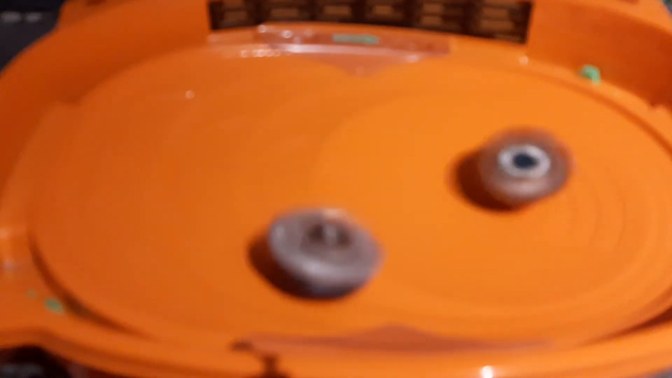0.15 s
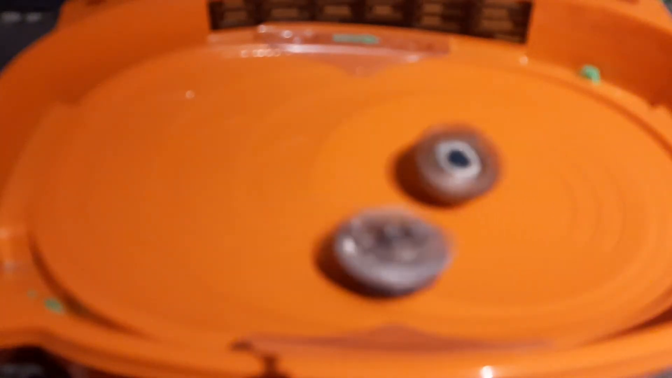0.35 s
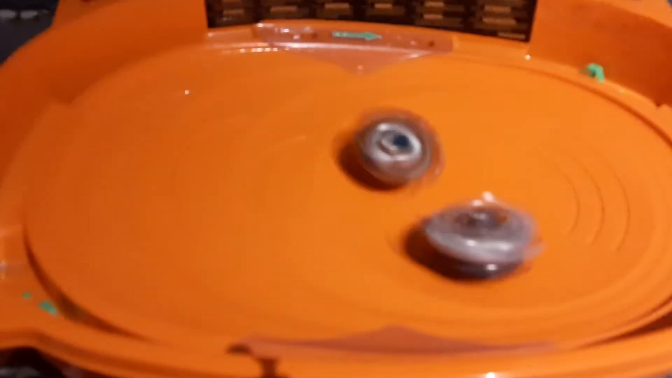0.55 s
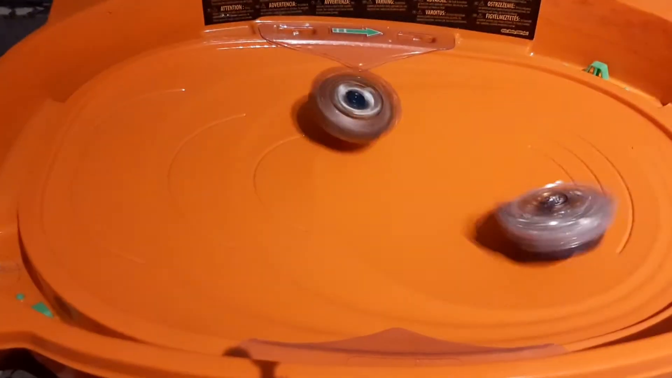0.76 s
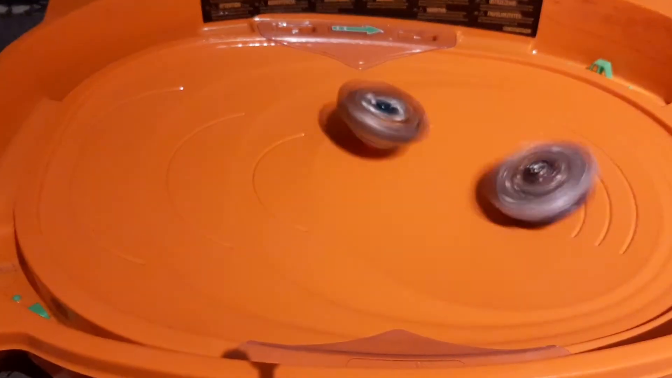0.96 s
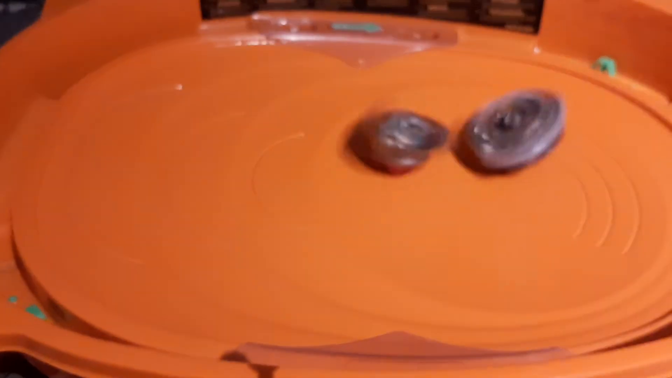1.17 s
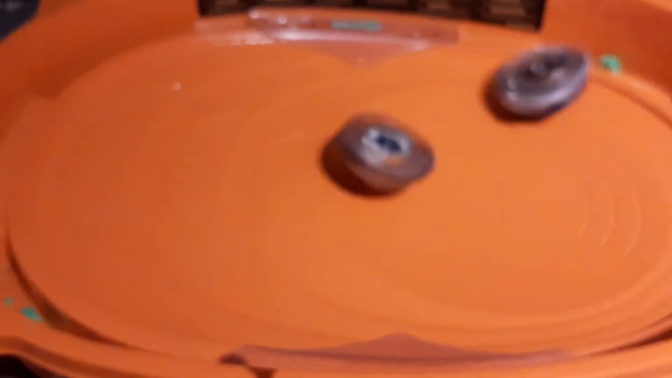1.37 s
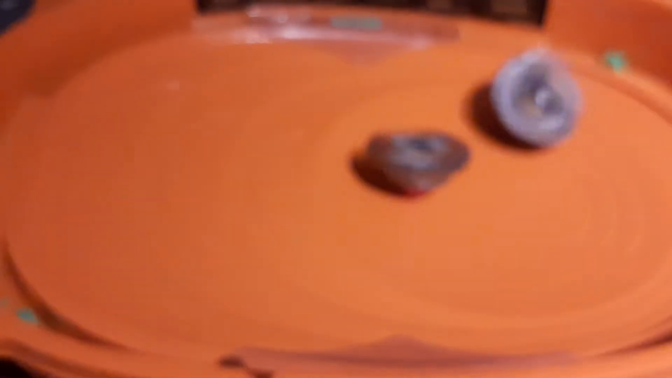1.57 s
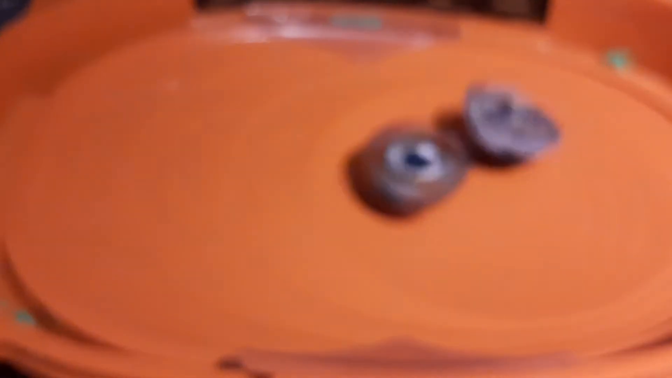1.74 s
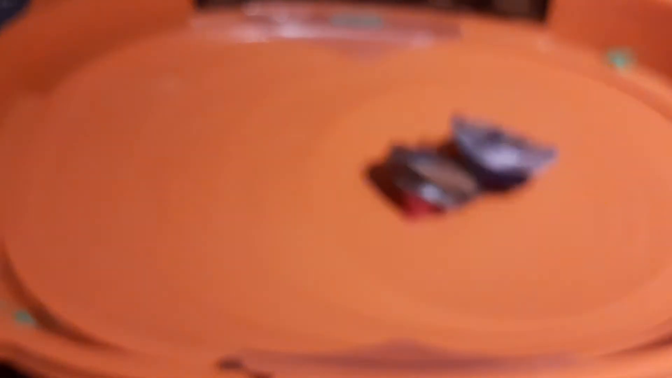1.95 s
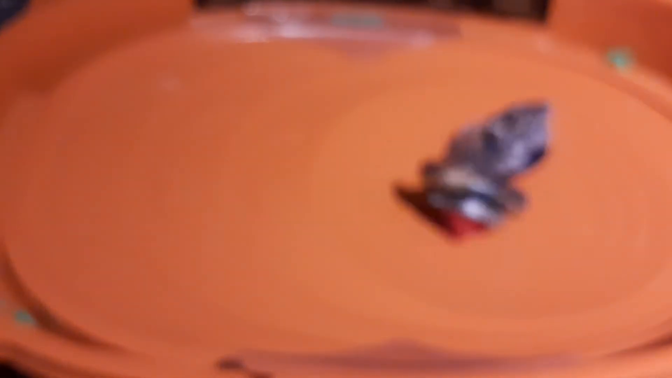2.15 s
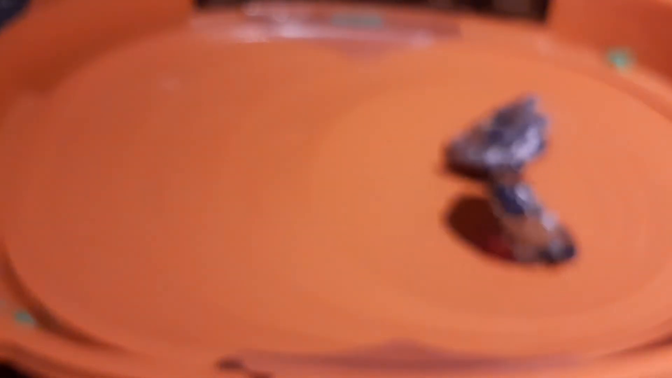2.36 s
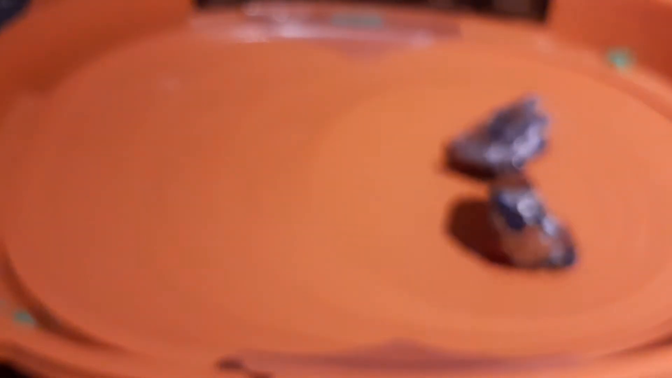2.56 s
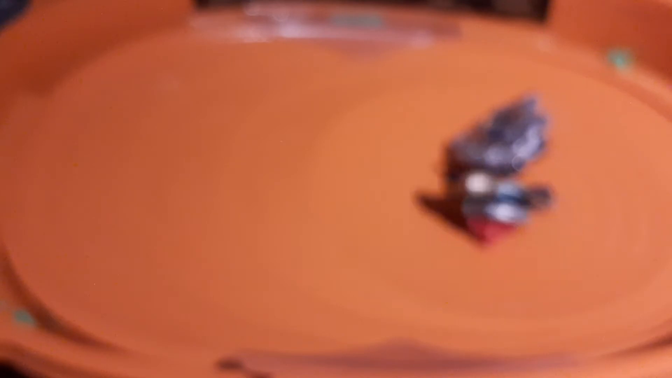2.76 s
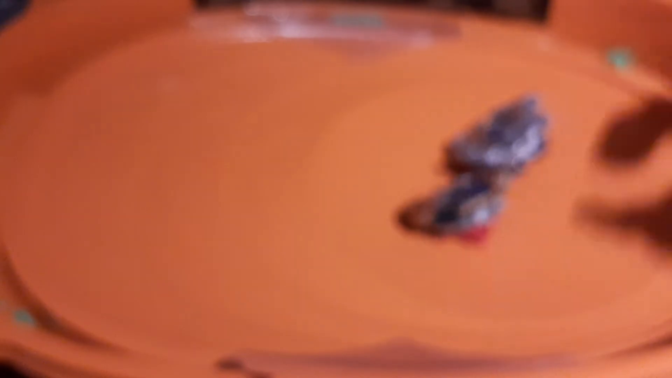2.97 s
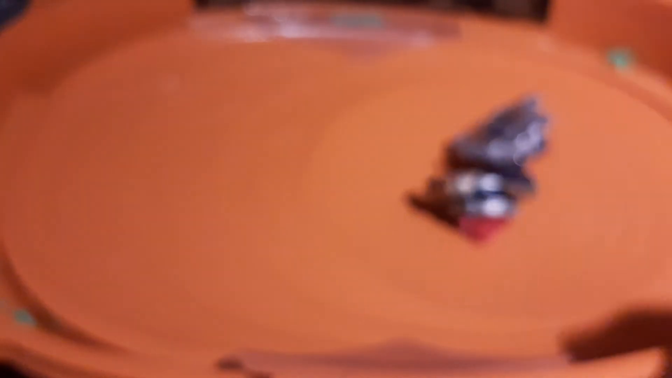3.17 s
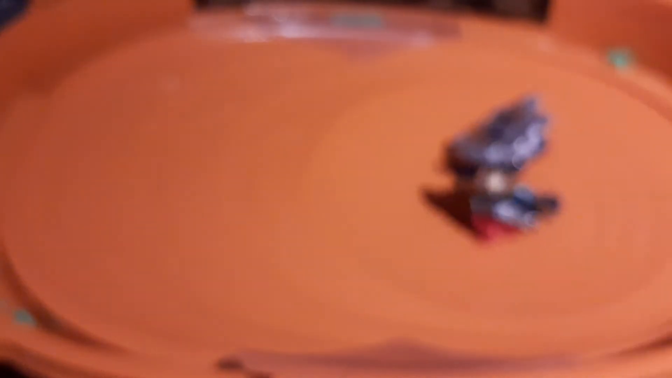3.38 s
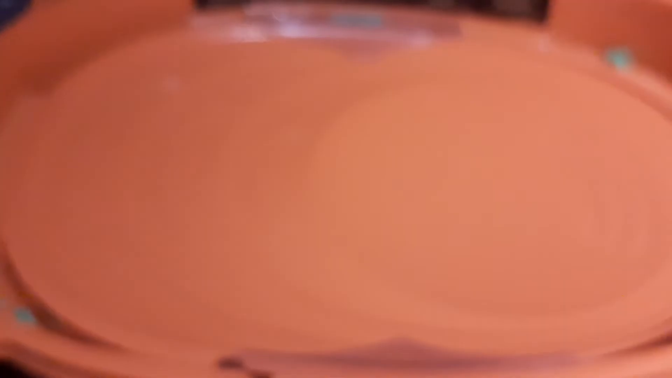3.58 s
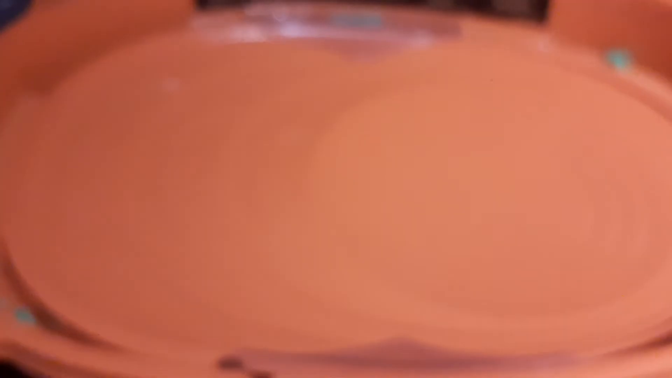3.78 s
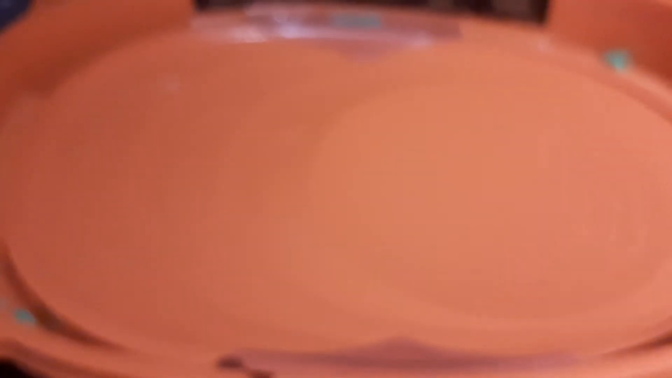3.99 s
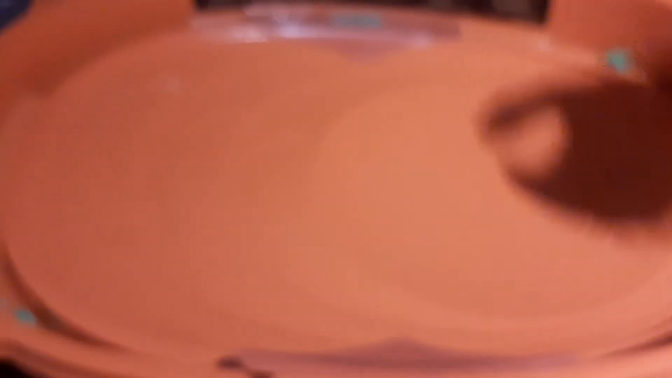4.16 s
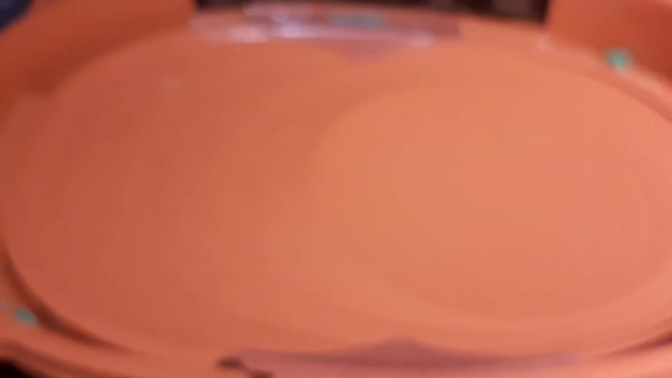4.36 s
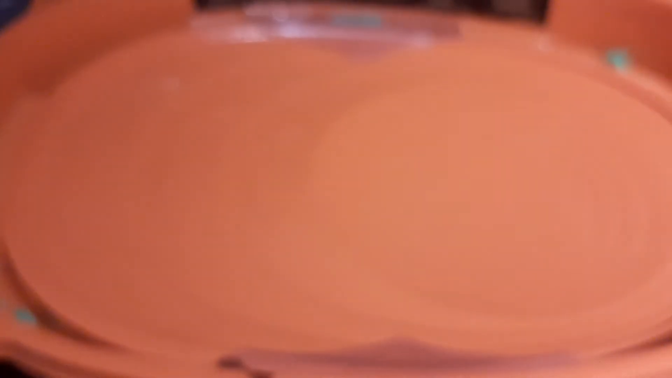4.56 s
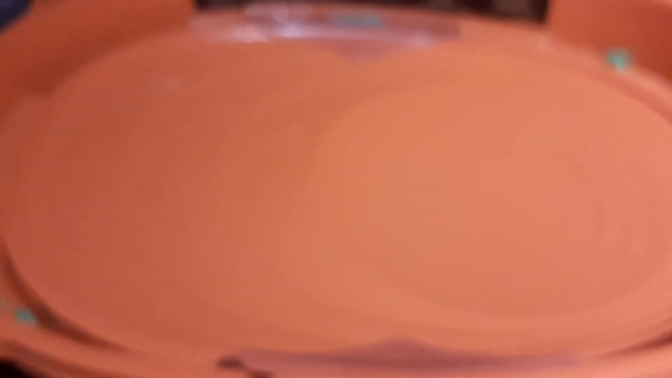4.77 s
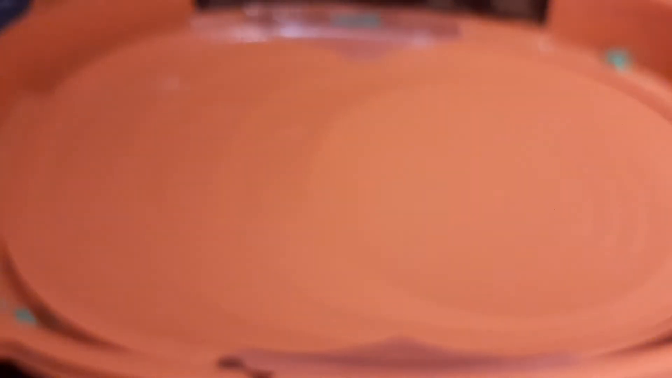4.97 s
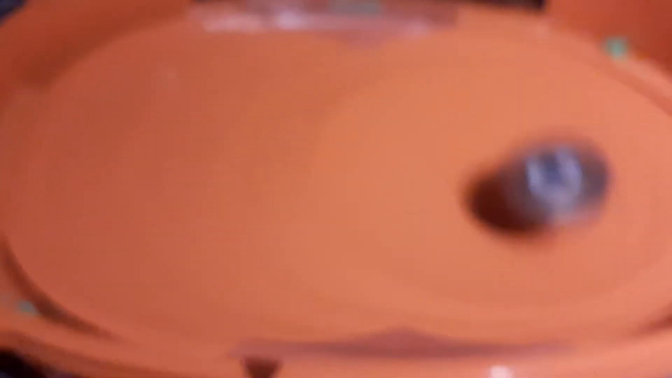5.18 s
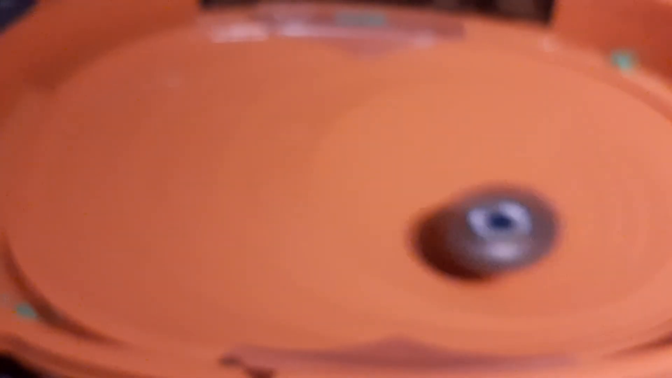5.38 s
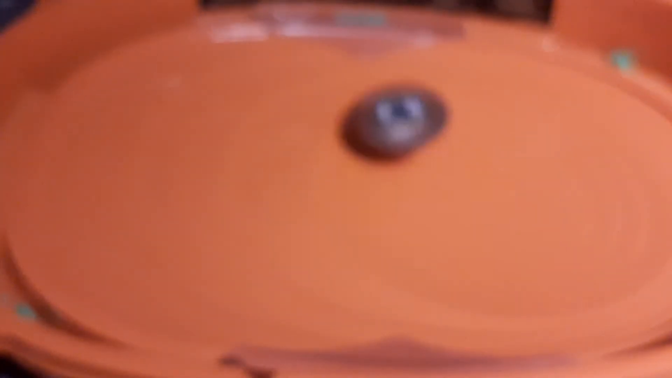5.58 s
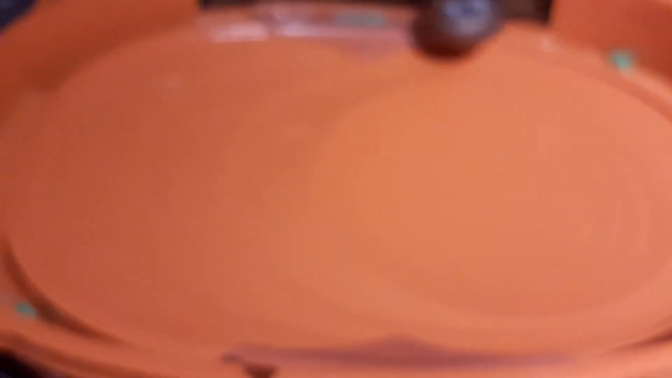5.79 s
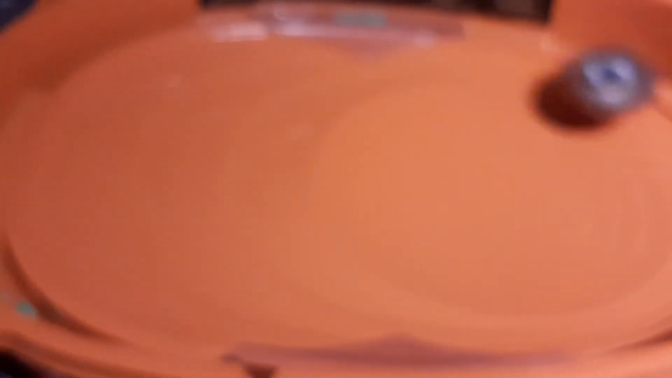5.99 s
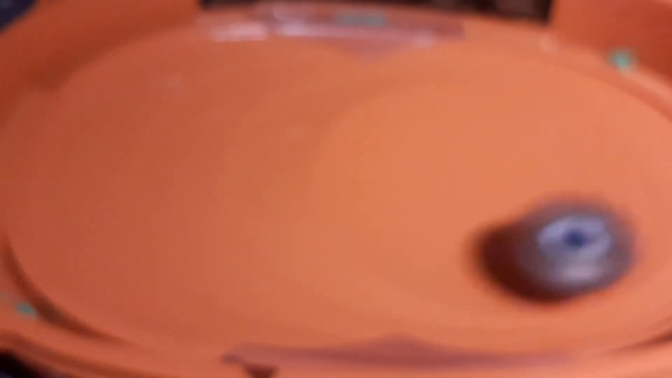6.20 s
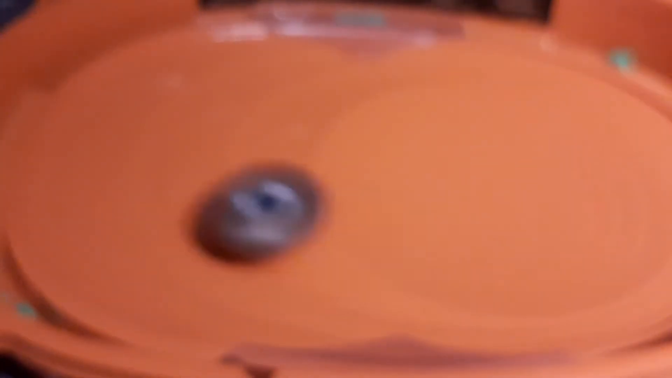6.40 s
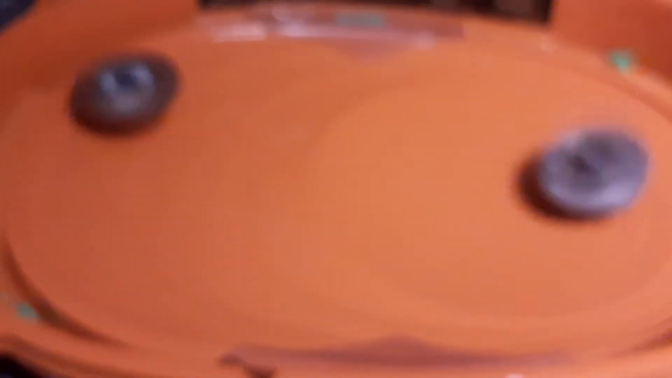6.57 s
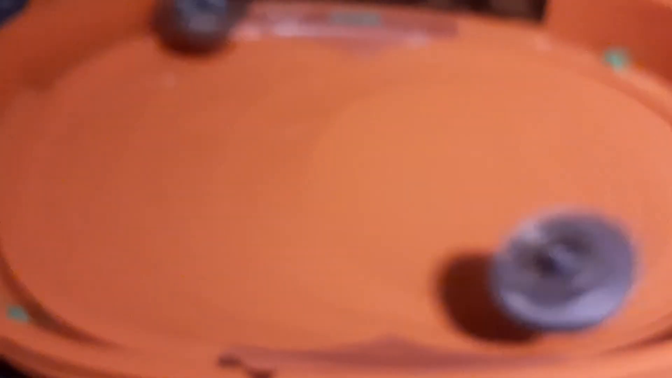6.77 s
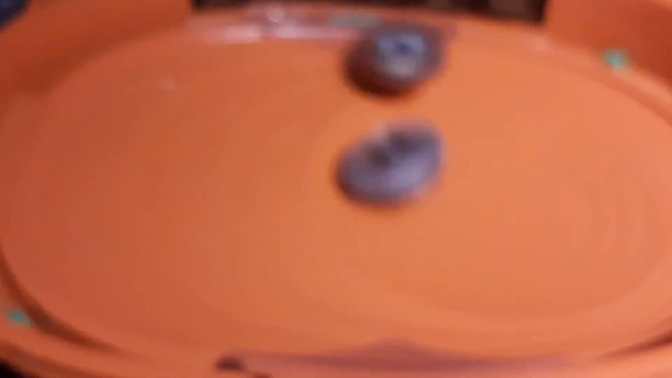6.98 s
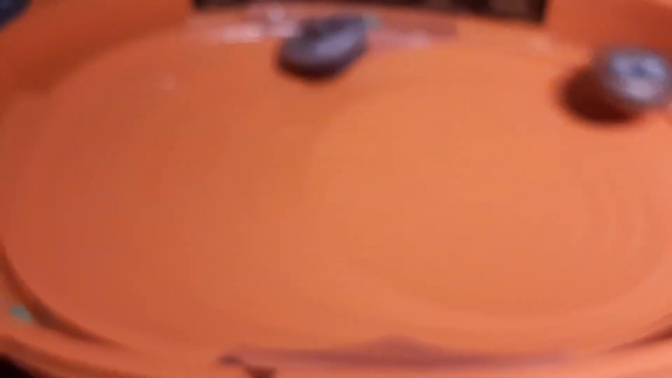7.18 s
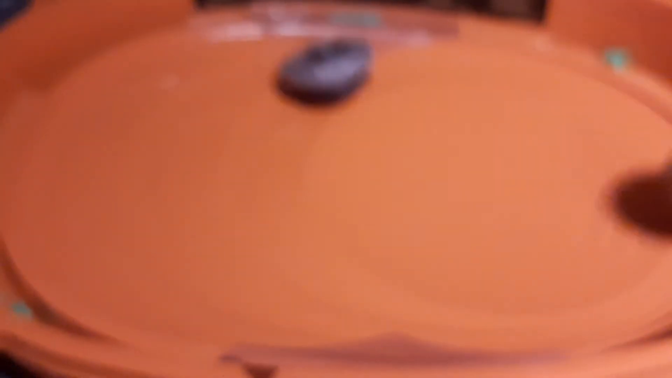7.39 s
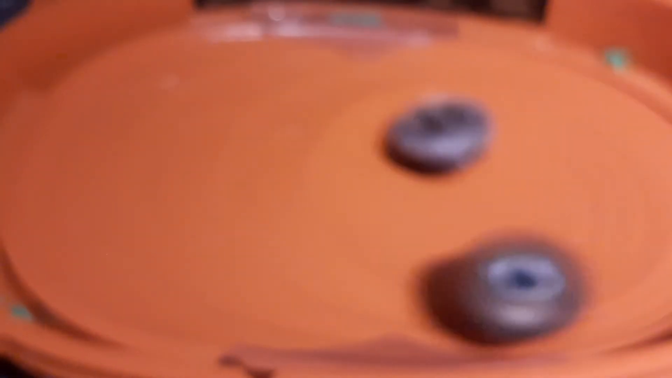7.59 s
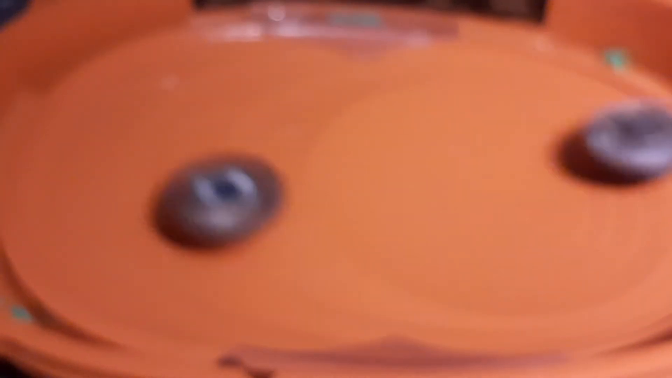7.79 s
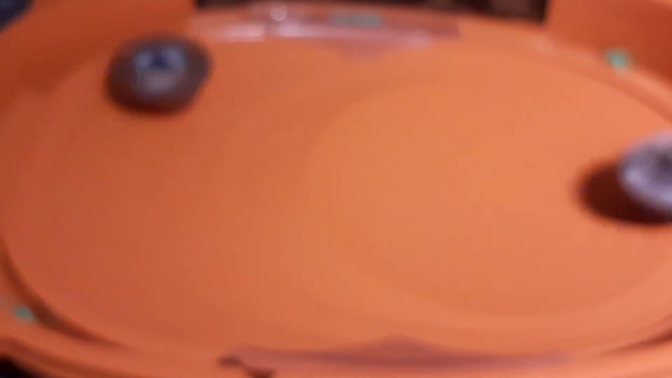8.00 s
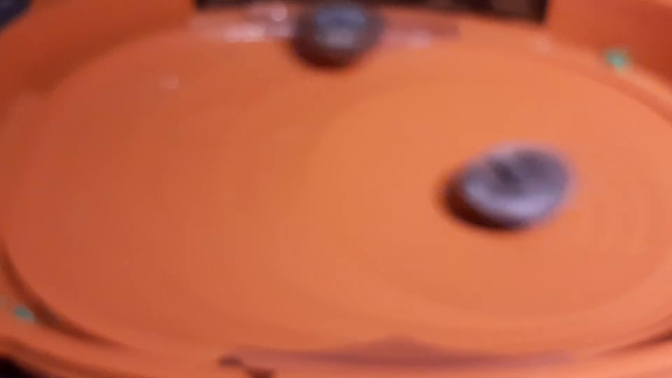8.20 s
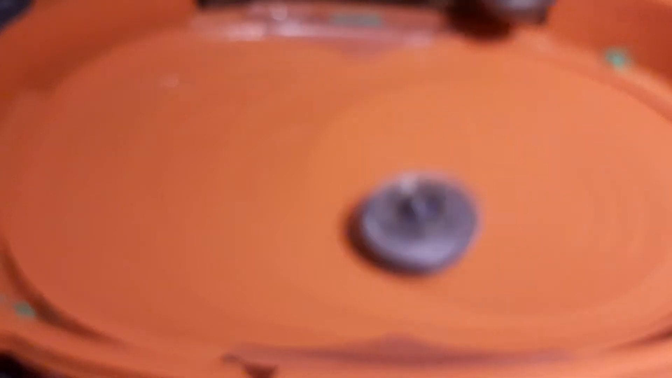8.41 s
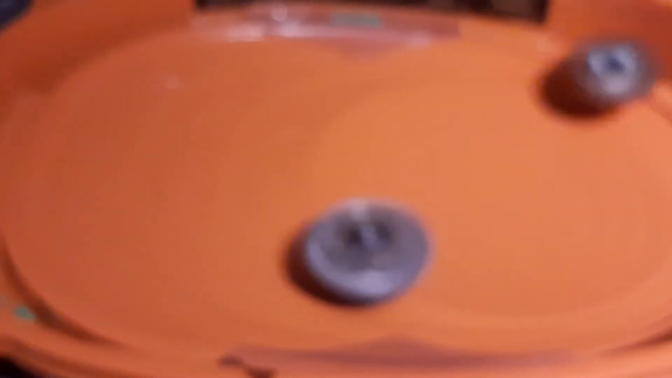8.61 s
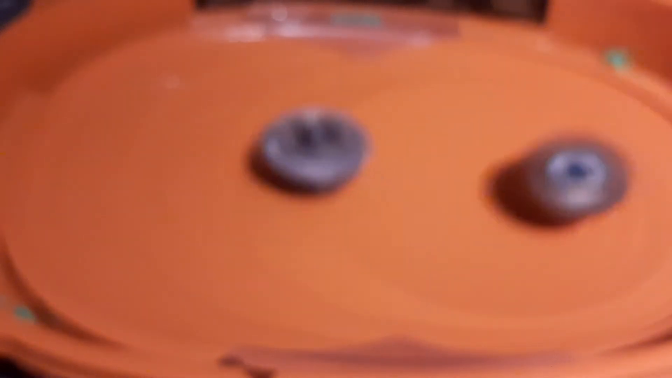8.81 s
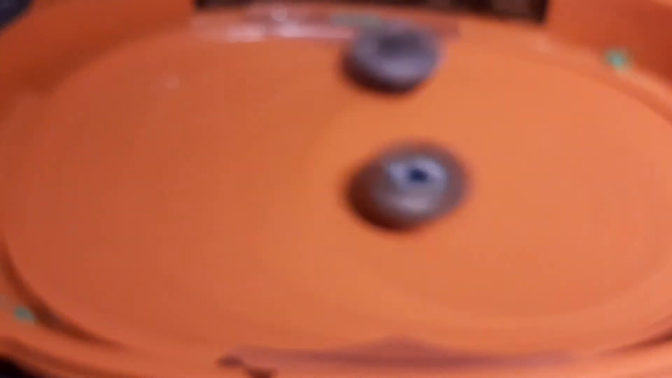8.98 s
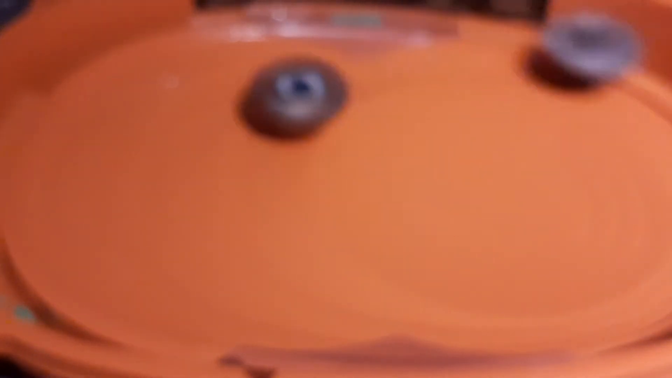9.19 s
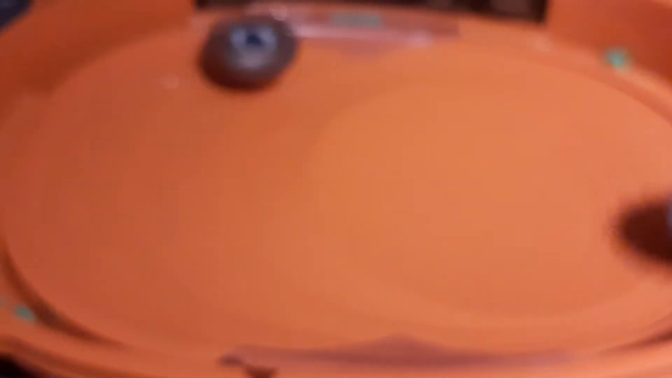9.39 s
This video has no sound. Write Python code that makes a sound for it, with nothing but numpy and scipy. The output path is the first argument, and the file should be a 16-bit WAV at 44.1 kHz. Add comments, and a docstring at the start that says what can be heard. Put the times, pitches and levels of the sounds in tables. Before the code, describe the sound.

A close stereo microphone, slightly louder on the right, catches tops battling in a hollow plastic arena. Soft scraping gives way to bursts of sharp clacks, slowing to loose rocking ticks. After a quiet gap with a soft bump and small rubs, a zipping ratchet launch lands a top, a second follows, and both race with low humming, sizzling skids and hard, crowded impacts in a short room tail.

```python
"""Two spinning tops battle in a thin plastic bowl, heard up close in a small room.
Scraping tips are tiny slips, taps and flaw knocks driving modes and noise; clashes are contact chatters
convolved with bowl responses. The tops topple, rock to rest and are handled: bump, swish, rubs, clicks.
Two ripcord launches (tooth clicks, cord rub, rising whirr) follow; fresh tops race, hum, skid and clatter."""
import sys
import numpy as np
from scipy import signal
from scipy.fft import rfft, irfft
from scipy.io import wavfile
from scipy.ndimage import uniform_filter1d

SR = 44100
rng = np.random.default_rng(int(sys.argv[2]) if len(sys.argv) > 2 else 0)


def unload_audio(sound):
    """Save the sound as a 16-bit wav file, at the path given as the first command line argument."""
    columns = np.transpose(np.atleast_2d(sound))
    # keep every value between -1 and 1, then stretch to whole-number steps
    steps = np.round(np.clip(columns, -1, 1) * 32767)
    wavfile.write(sys.argv[1], SR, steps.astype(np.int16))


N = 416744
TIME = np.arange(N) / SR
SECOND_BATTLE_S = 4.7


def undb(db):
    """Decibels to gain."""
    return 10 ** (np.asarray(db) / 20)


def unit(x):
    """Scale to rms 1."""
    return x / np.sqrt(np.mean(x ** 2))


def fade(t, t60):
    """Exponential decay, 60 dB down at t60."""
    return np.exp(-np.log(1000) * t / t60)


def swell(s, width, db):
    """Gaussian rise and fall centred on s, down to 1/e at +-width."""
    return undb(db) * np.exp(-((TIME - s) / width) ** 2)


def curve(points):
    """Interpolate a (t/s, value) table over the scene."""
    return np.interp(TIME, *np.transpose(points))


def sine(hz):
    """Sine following a frequency track."""
    return np.sin(2 * np.pi * np.cumsum(hz) / SR)


def gain_at(hz, points):
    """Gain of an (f/Hz, level/dB) table on a log-frequency axis."""
    f, db = np.transpose(points)
    return undb(np.interp(np.log(hz + 1), np.log(f), db))


# stereo width: f/Hz, side re mid/dB
WIDTH = [(60, -3), (250, -7), (600, -9), (1100, -4.5), (2000, 0), (16000, 0)]


def noise(size, points, band=(0, SR)):
    """Coloured stereo noise of rms 1, narrower below 2 kHz."""
    hz = np.fft.rfftfreq(size, 1 / SR)
    mid, side = rfft(rng.standard_normal((2, size)))
    side = side * gain_at(hz, WIDTH)
    low_skirt = 1 + (band[0] / (hz + 1)) ** 12
    high_skirt = 1 + (hz / band[1]) ** 12
    skirts = (low_skirt * high_skirt) ** -.5
    return unit(irfft(np.array([mid + side, mid - side]) * gain_at(hz, points) * skirts, size))


def walk(rate):
    """Smooth random track, spread near 1, with rate new values per second."""
    hold = int(SR / rate)
    steps = np.repeat(rng.standard_normal(N // hold + 1), hold)
    return 1.2 * uniform_filter1d(steps, hold)[:N]


def add(out, s, sound):
    """Mix a stereo sound in at time s."""
    i = int(s * SR)
    out[:, i:i + sound.shape[1]] += sound[:, :N - i]


def through(x, response):
    """Convolve, keeping the length of x."""
    return signal.oaconvolve(np.atleast_2d(x), response, axes=1)[:, :x.shape[-1]]


def age(s):
    """Seconds since the battle in progress began."""
    return np.where(s < SECOND_BATTLE_S, s, s - SECOND_BATTLE_S)


def ring(modes, t, scatter_db=5.0, detune=0.018):
    """Damped modes; strengths vary with the spot struck, high ones reach the two sides out of step."""
    hz, db, t60 = np.transpose(modes)[:, :, None]
    strength, shift, lag, sign = rng.standard_normal((len(modes), 4)).T[:, :, None]
    phase = 2 * np.pi * hz * (1 + detune * shift) * t
    size = np.sign(sign) * undb(db + scatter_db * strength) * fade(t, t60)
    return np.array([np.sum(size * np.sin(phase + ear * lag * hz / 2400), axis=0) for ear in (1, -1)])


# short ring of the tops' bodies: f/Hz, level/dB, t60/s
TOP_MODES = [(2660, -6, 0.037), (3440, 1, 0.073), (4350, 4.5, 0.052), (4940, 5, 0.045), (5640, 0, .04),
             (6700, -10.5, .04), (7550, 0.5, 0.064)]


def top_ring(force, size=3072):
    """The tops' bodies ring briefly with each contact."""
    return unit(through(force, ring(TOP_MODES, np.arange(size) / SR, scatter_db=0.0, detune=.003)))


# dense resonances of bowl and tops: f/Hz, level/dB
PLASTIC = [(35, -14.5), (85, 5), (120, 2), (170, 6), (300, 7.5), (420, -4), (600, 5.5), (1600, -2),
           (2100, -2.5), (2600, -3.5), (7500, -12), (8600, -23.5), (11500, -14), (15800, -15)]
# edges of the four bands thud, shell, crack, air: f/Hz
EDGES_HZ = [30, 500, 2500, 8300, 17000]
# decay of thud, shell, crack, air: t60/s
RING_T60_S = [0.068, 0.036, 0.039, 0.028]
# modes of the bowl: f/Hz, level/dB, t60/s
BOWL = [(565, -11.5, 0.051), (660, -12, 0.06), (768, -3.5, 0.025), (881, -5, 0.083), (930, 1, 0.047),
        (1044, -0.5, 0.027), (1200, 0, 0.019), (1322, -7.5, 0.024), (1512, -1, 0.041), (1559, 2.5, 0.035),
        (1977, 2.5, 0.016), (1924, -7, 0.039)]


def plastic_band(size, k):
    """Dense plastic resonances of band k as coloured noise."""
    return noise(size, PLASTIC, EDGES_HZ[k:k + 2])


def spot(size=4096, modes_db=1.5, build_s=0.00027, scatter_db=3, detune=.009):
    """Responses at one spot of the bowl: its low thud and its ringing shell."""
    t = np.arange(size) / SR
    build = 1 - np.exp(-t / build_s)  # thud and shell build up over a fraction of a millisecond
    thud, shell = (unit(plastic_band(size, k) * build * fade(t, RING_T60_S[k])) for k in (0, 1))
    modes = unit(ring(BOWL, t, scatter_db, detune))
    return np.array([thud, unit(shell + undb(modes_db) * modes)])


# tips rolling on the floor, one curve per battle: t/s, bowl level/dB before the rattle dip
FIRST_ROLL = [(0, -48), (.14, -51), (.62, -53.5), (.92, -44.5), (1.05, -40), (1.4, -42.5), (1.53, -53),
              (1.66, -40.5), (1.9, -47.5), (2.36, -42.5), (2.43, -53.5), (2.62, -86), (2.77, -52.5),
              (2.93, -55), (3.01, -70), (3.12, -57), (3.3, -69.5), (3.8, -72.5), (4.2, -87.5)]
SECOND_ROLL = [(4.92, -79), (5.22, -31.5), (5.28, -27.5), (5.5, -35.5), (5.9, -31.5), (5.985, -42.5),
               (6.04, -36.5), (6.3, -33.5), (6.58, -38.5), (6.75, -34), (7.6, -29.5), (7.82, -38),
               (8.1, -35), (8.55, -31), (8.72, -40.5), (8.81, -39.5), (8.9, -27.5), (9.05, -33.5),
               (9.45, -28)]
# tops grind on each other or along the wall: full from t/s, length/s, bowl level/dB before the dip
GRINDS = [(1.203, .12, -28.5), (1.694, 0.079, -35), (1.99, 0.13, -35), (2.13, 0.16, -33.5),
          (6.814, 0.014, -48), (6.945, 0.31, -29), (7.34, 0.1, -26.5), (8.47, 0.11, -35)]
GRIND_ATTACK_S, GRIND_T60_S = 0.1, 0.23
ROLL_RUMBLE_DB, GRIND_RUMBLE_DB = -6, -10  # re bowl
ROLL_HISS_DB, GRIND_HISS_DB = -6, -3.5  # re bowl at the start of a battle
HISS_FALL_DB_PER_S = 1.02  # the hiss dulls as the spin runs down


def scrape_levels():
    """Bowl, rumble and hiss in dB: rolling plus grinding bouts that build, hold and die away."""
    roll = undb(curve(FIRST_ROLL + SECOND_ROLL))
    grind = 0
    for s, length, db in GRINDS:
        attack = np.clip(1 + (TIME - s) / GRIND_ATTACK_S, 0, 1)
        grind = grind + undb(db) * attack * fade(np.maximum(TIME - s - length, 0), GRIND_T60_S)

    def blend(roll_db, grind_db):
        return 20 * np.log10(np.hypot(roll * undb(roll_db), grind * undb(grind_db)))

    hiss = blend(ROLL_HISS_DB, GRIND_HISS_DB) - HISS_FALL_DB_PER_S * age(TIME)
    return blend(0, 0), blend(ROLL_RUMBLE_DB, GRIND_RUMBLE_DB), hiss


# loose rattling while tops lean on each other or tumble: t/s, level/dB re scraping slips
RATTLE = [(0, -17.5), (.95, -16), (1.1, 4), (2.4, -3.5), (3.3, -1.5), (5.2, -4), (5.6, -12), (6.5, -8.5),
          (6.9, -6.5), (7.5, -5), (7.7, -10), (9.4, -8.5)]


def tip_force(grains_per_s=4000, grain_db=3.5, wobble_db=1.5, skip_db=1.82, flaw_db=-7, taps_per_s=130, count=3):
    """Tips catch in tiny slips, harder once a turn; flaws knock on every turn; leaning tops add taps."""
    spin_hz = np.interp(TIME, [0, 2.4, 5, 9.4], [41.93, 24.02, 90.2, 71.43])
    turns = np.cumsum(spin_hz * (1 + 0.027 * walk(9))) / SR
    grain = undb(grain_db * np.minimum(rng.exponential(size=N), 4))
    slips = (rng.random(N) < grains_per_s / SR) * rng.choice([-1, 1], N) * grain
    flaws = sum(np.diff(np.floor(turns + place), prepend=0) for place in rng.random(count))
    taps = (rng.random(N) < taps_per_s / SR) * rng.uniform(-1, 1, N)
    loose = undb(curve(RATTLE))
    wobble = wobble_db * np.sin(2 * np.pi * turns)
    skips = skip_db * np.minimum(loose, 1) * walk(60)  # an upright top bears down evenly
    force = unit(slips) + undb(flaw_db) * unit(flaws - flaws.mean()) + loose * unit(taps)
    return force * undb(wobble + skips) / np.sqrt(1 + loose ** 2 / 2)


def cracks(force, size=2048):
    """Crack and air: modes too dense to tell apart, whose energy jumps at each contact and drains away."""
    t = np.arange(size) / SR
    bands = []
    for k in (2, 3):
        energy = np.abs(through(force ** 2, fade(t[None], RING_T60_S[k]) ** 2))
        bands.append(np.sqrt(energy) * plastic_band(len(force), k))
    return bands


def scrape(air_db=-6, dip_db=2.0, spots_per_s=40, ring_db=-12, grit_db=3.5, count=7):
    """The tips glide from spot to spot, so the colour of their scraping shifts smoothly."""
    bowl, rumble, hiss = scrape_levels()
    force = tip_force()
    nearness = np.array([walk(spots_per_s) for _ in range(count)])
    nearness = nearness / np.linalg.norm(nearness, axis=0)
    body = 0
    for near in nearness:
        response = spot(scatter_db=1.5, detune=0.0046).reshape(4, -1)
        body = body + near * through(force, response)
    snap, air = cracks(force * undb(grit_db * walk(260)))  # grit under the tip makes the hiss sputter
    crack = unit(snap) + undb(ring_db) * top_ring(force)
    parts = [body[:2], body[2:], crack, air]
    levels = [rumble, bowl, hiss, hiss + air_db]
    dip = dip_db * undb(curve(RATTLE))  # the scraping is quieter where the rattling is loose
    return sum(undb(db - dip) * unit(part) for db, part in zip(levels, parts))


# thud and crack levels below are re bowl, before the trims in clacks()
# rim clacks on the other top or the wall:
# t/s, bowl level/dB, crack/dB, chatter/s, thud/dB, favoured f/Hz
CLACKS = [(0.098, -54.5, 9.5, 0.032, -15, 2480), (0.768, -44, -6.5, 0.0034, -24, 1500),
          (0.883, -50.5, 2, 0.004, -16, 950), (1.044, -33.5, -1.5, 0.0024, -20, 980),
          (1.078, -28.5, -7, 0.0052, -16, 1440), (1.102, -25.5, 0, 0.0027, -10, 1600),
          (1.136, -22, -7, 0.0019, -13, 1580), (1.164, -22.5, 5.5, 0.005, -5.5, 1150),
          (1.292, -33, 2, 0.004, 0, 1500), (1.363, -27, -7, 0.0066, -6.5, 1500),
          (1.390, -31, -9, 0.0029, -7, 1500), (1.474, -61.5, 12.5, 0.0023, -18, 1000),
          (1.588, -42, 0, 0.0035, -3, 1000), (1.597, -33.5, -0.5, 0.0074, -3, 1520),
          (1.661, -27.5, -1, 0.0026, -5, 1530), (1.7138, -33.5, 12.5, 0.0031, -4.5, 1250),
          (1.728, -28, 0.5, 0.013, -6, 1400), (1.833, -40, 0.5, 0.0046, -15.5, 1130),
          (1.917, -30, -2, 0.004, -17, 1120), (1.967, -26, 7, 0.0021, -28.5, 1300),
          (1.976, -30.5, 3.5, .001, -19, 1300), (1.985, -22, 0.5, 0.0055, -24, 1320),
          (2.043, -27.5, -8.5, 0.0016, -17, 775), (2.069, -27, -5.5, .0022, -18, 1500),
          (2.079, -31.5, -2, 0.0037, -17.5, 1100), (2.102, -27, 3.5, 0.0021, -9, 1150),
          (2.115, -30.5, 4, 0.0025, -14, 1000), (2.124, -28.5, 3, .004, -21, 1200),
          (2.153, -29.5, 2.5, 0.0044, -17.5, 950), (2.166, -32.5, -2, 0.0058, -18.5, 950),
          (2.184, -27.5, -8, 0.0069, -16, 1200), (2.204, -29.5, -1, 0.0068, -14.5, 1000),
          (2.223, -32.5, -6, 0.0045, -17, 950), (2.243, -32, -2, .004, -20, 950),
          (2.254, -28.5, -3, 0.0067, -30, 1020), (2.272, -41, -1, 0.0027, -23, 960),
          (2.285, -31, -6, 0.0019, -23, 1110), (2.305, -38, -11, 0.0057, -21, 950),
          (2.324, -37, -8, 0.0033, -23, 1000), (2.343, -41.5, -12, 0.003, -18, 950),
          (2.362, -38, -7, 0.0036, -12, 950), (2.383, -36.5, -6, 0.0055, -8, 955),
          (2.441, -54.5, -2, 0.0022, 0, 1000), (2.492, -50, -5, 0.0025, -16, 1520),
          (5.241, -21, -5, 0.0025, -20, 1440), (5.356, -32, -20, 0.0025, -20, 1520),
          (5.813, -16.5, -9, 0.002, -31, 1360), (5.865, -28.5, -8, 0.049, -0.5, 1000),
          (6.641, -21, -3, 0.0093, -7, 1000), (6.71, -26, -8, .006, -21, 1400),
          (6.7203, -19.5, -3.5, 0.0043, -24, 1700), (6.7633, -11.5, -5.5, 0.0054, -18, 1660),
          (6.78, -17, -5.5, 0.026, -11.5, 1660), (6.83, -24, -8, 0.006, -25, 1620),
          (6.886, -36, 5, .003, -12, 1100), (6.8905, -18, -0.5, 0.0055, -5, 1310),
          (6.951, -18, -8, 0.0048, -8, 600), (6.959, -14, -6.5, 0.0074, -10, 1120),
          (6.991, -16.5, -8.5, 0.01, -11, 1510), (7.001, -19.5, -9, 0.0096, -9, 1620),
          (7.013, -25, -9, 0.0078, -11, 1600), (7.031, -17.5, -7.5, 0.0095, -13.5, 1610),
          (7.0732, -26, 0, 0.0011, 3.5, 1500), (7.1, -22, -8, 0.0049, -20, 940),
          (7.144, -16.5, -9.5, 0.0048, -10, 654), (7.184, -18, -7, 0.0053, -14.5, 920),
          (7.214, -19, -14, 0.0027, -21, 940), (7.225, -16.5, -3, 0.0022, -15, 890),
          (7.234, -23.5, -2, 0.0053, -15, 990), (7.279, -17.5, 0.5, 0.0078, -17, 1240),
          (7.296, -26, 0.5, 0.011, -11.5, 1200), (7.33, -20.5, -2, 0.0029, -7, 950),
          (7.339, -17, -5, 0.01, -7, 950), (7.383, -17.5, -7, 0.0054, -4, 980),
          (7.406, -23, -8, 0.0032, -17, 1040), (7.495, -19.5, -10.5, 0.014, -16, 930),
          (7.509, -20.5, -6, 0.0066, -16.5, 970), (7.521, -14, -10.5, 0.0083, -16, 870),
          (7.557, -20, -7.5, 0.012, -12, 660), (7.920, -24, -2.5, 0.0057, -11, 1280),
          (8.268, -23, 0.5, 0.0027, -5.5, 1230), (8.362, -31.5, 8.5, 0.00093, 0, 1500),
          (8.406, -17.5, -6, 0.0033, -22, 1020), (8.4394, -21, -5.5, 0.001, -31, 1500),
          (8.445, -14.5, -18, 0.0064, -25, 1050), (8.530, -18.5, -9.5, 0.0064, -7, 950),
          (8.591, -39.5, 5.5, 0.0037, 3, 1000), (9.064, -19.5, -3, 0.002, -7.5, 1820),
          (9.077, -24, -10, 0.012, -7, 930), (9.155, -21.5, -5, 0.0029, -10, 1160),
          (9.307, -27, -7.5, 0.036, -8, 1040)]
# a top lands on its tip and bounces, drumming the floor: t/s, bowl level/dB, chatter/s, favoured f/Hz
LANDINGS = [(1.1845, -28, 0.0037, 1100), (1.241, -19, 0.0031, 1310), (1.253, -23.5, 0.049, 1150),
            (5.1198, -19, 0.0035, 1370), (5.136, -21.5, 0.016, 1150), (5.312, -38, 0.013, 1400),
            (6.6254, -15.5, 0.006, 1670), (8.622, -34, 0.0098, 1150)]
LANDING_THUD_DB, LANDING_CRACK_DB = -2.5, -3.5
# hard smacks, each followed by a low thump sliding down: # t/s, bowl level/dB, chatter/s, left thump level/dB,
# right thump level/dB
SMACKS = [(0.579, -29, 0.0019, -25.5, -31), (5.054, -28.5, 0.0029, -41.5, -18.5),
          (6.551, -28.5, 0.0047, -39, -19.5), (7.0685, -29, 0.0014, -15.5, -36),
          (8.3557, -30.5, 0.0015, -13.5, -25)]
SMACK_THUD_DB, SMACK_CRACK_DB = -1.5, 8
# toppled tops rock to rest: t/s, bowl level/dB, chatter/s, favoured f/Hz
ROCKS = [(2.643, -64, .012, 950), (2.691, -60, .003, 1000), (2.702, -53, 0.0023, 1200),
         (2.748, -38.5, 0.006, 1040), (2.762, -41.5, 0.0084, 860), (2.813, -48, 0.004, 1150),
         (2.848, -42, 0.0066, 1150), (2.896, -53, 0.0019, 1000), (2.912, -51, .006, 930),
         (2.931, -37, 0.0079, 990), (2.953, -44.5, 0.006, 1000), (3.065, -47, 0.0042, 1350),
         (3.142, -49, 0.0084, 1100), (3.162, -53, 0.0014, 1150), (3.2354, -54, 0.0019, 1280),
         (3.325, -57.5, 0.0021, 1250)]
ROCK_THUD_DB, ROCK_CRACK_DB = -19.5, -5
# a tip catches on the floor and ticks: t/s, bowl level/dB
TICKS = [(0.940, -57), (0.959, -49), (0.985, -43.5), (1.216, -37), (5.518, -36), (7.986, -38.5),
         (8.127, -39), (8.155, -43), (8.190, -42), (8.331, -40)]
TICK_CRACK_DB, TICK_CHATTER_S = -2, .002
# small parts click while the tops are taken out and reloaded: t/s, bowl level/dB
CLICKS = [(3.649, -70.5), (3.685, -75), (3.712, -74), (3.742, -81), (4.300, -74.5), (4.365, -83.5),
          (4.491, -78.5)]
CLICK_CRACK_DB, CLICK_CHATTER_S = 10.5, 0.0017
SMALL_THUD_DB = -10.5  # ticks and clicks
BOWL_HZ = 1150  # favoured f of smacks, ticks and clicks


def blows():
    """Every blow as (t/s, bowl level/dB, thud/dB, crack/dB, chatter/s, favoured f/Hz)."""
    return ([(s, db, thud, crack, length, hz) for s, db, crack, length, thud, hz in CLACKS]
            + [(s, db, LANDING_THUD_DB, LANDING_CRACK_DB, length, hz) for s, db, length, hz in LANDINGS]
            + [(s, db, SMACK_THUD_DB, SMACK_CRACK_DB, length, BOWL_HZ) for s, db, length, _, _ in SMACKS]
            + [(s, db, ROCK_THUD_DB, ROCK_CRACK_DB, length, hz) for s, db, length, hz in ROCKS]
            + [(s, db, SMALL_THUD_DB, TICK_CRACK_DB, TICK_CHATTER_S, BOWL_HZ) for s, db in TICKS]
            + [(s, db, SMALL_THUD_DB, CLICK_CRACK_DB, CLICK_CHATTER_S, BOWL_HZ) for s, db in CLICKS])


def chatter(length, gap=.004, scatter_db=2.5, first_db=-1, count=10, size=8192):
    """The teeth of a spinning rim strike several times, on the whole ever more weakly."""
    when = np.cumsum(gap * rng.uniform(.4, 1.6, count))
    when = when - when[0]
    strike_db = np.where(when == 0, first_db, scatter_db * rng.standard_normal(count))
    force = undb(strike_db) * np.exp(-(when / (1.97 * length)) ** 2)
    return np.bincount((when * SR).astype(int), force, size)[:size]


def favour(x, hz, peak_db=3.5, q=2.2):
    """Bring out the resonances near hz by adding a peak-filtered copy."""
    return x + undb(peak_db) * signal.lfilter(*signal.iirpeak(hz, q, fs=SR), x)


def snaps(contacts, size=2048, build_s=0.00065, first_db=3, first_t60=0.0092):
    """Crack and air of one blow: sharp snap, then short ring; every contact repeats the same response."""
    t = np.arange(size) / SR
    build = 1 - np.exp(-t / build_s)
    snap = undb(first_db) * fade(t, first_t60)
    return [through(contacts, plastic_band(size, k) * build * (snap + fade(t, RING_T60_S[k]))) for k in (2, 3)]


AIR_DB, AIR_DB_PER_CRACK_DB = -4.5, 0.44  # air re crack: the higher the crack level, the brighter
AIR_RISE_DB_PER_S = 0.04  # blows gain a little air over a battle
TOP_RING_DB = -11  # re crack


def clacks(thud_trim_db=-1, crack_trim_db=-1.5):
    """Each blow is a short chatter into one spot, with the bowl's rings near one frequency favoured."""
    out = np.zeros((2, N))
    for s, db, thud, crack, length, ring_hz in blows():
        air_level = AIR_DB + AIR_DB_PER_CRACK_DB * crack + AIR_RISE_DB_PER_S * age(s)
        contacts = chatter(max(length, .001))
        low, shell = (through(contacts, response) for response in spot())
        snap, air = snaps(contacts)
        ringing_snap = unit(snap) + undb(TOP_RING_DB) * top_ring(contacts)
        parts = [low, favour(shell, ring_hz), ringing_snap, air]
        levels = db + np.array([thud + thud_trim_db, 0, crack + crack_trim_db, crack + air_level])
        blow = sum(undb(level) * unit(part) for level, part in zip(levels, parts))
        add(out, s, blow * np.sqrt(.02 * SR / len(contacts)))  # level: part energy spread over 20 ms
    return out


# how each pair of tops drives the bowl: f/Hz, level/dB
FIRST_PAIR = [(50, -3), (110, -1), (160, 4.5), (250, 0.5), (450, -4), (700, 1), (1000, 0), (1500, 0.5),
              (1950, -2), (3200, -4.5), (7000, 0.5), (13000, -5.5)]
SECOND_PAIR = [(50, -4), (110, 0.5), (170, 0), (340, -1), (480, 2.5), (700, -1.8), (1050, 1.15),
               (1800, 0.14), (3200, -1.6), (7000, 0), (13000, -3.6)]


def tops():
    """Blows and scraping, coloured by the pair of tops that is in the bowl."""
    spectrum, hz = rfft(clacks() + scrape()), np.fft.rfftfreq(N, 1 / SR)
    first, second = (irfft(spectrum * gain_at(hz, pair), N) for pair in (FIRST_PAIR, SECOND_PAIR))
    return np.where(TIME < SECOND_BATTLE_S, first, second)


def thumps(rise_s=0.0092, start_hz=220, end_hz=46, slide_s=.0075):
    """After each hard smack a low thump follows, sliding down in a few ever slower cycles."""
    out, t = np.zeros((2, N)), np.arange(SR // 8) / SR
    phase = 2 * np.pi * np.cumsum(end_hz + (start_hz - end_hz) * np.exp(-t / slide_s)) / SR
    envelope = t / rise_s * np.exp(1 - t / rise_s)
    swing = np.sin(phase + np.array([[0], [-1.2]])) * envelope  # right lags by 1.2 rad
    for s, _, _, left_db, right_db in SMACKS:
        add(out, s, undb([[left_db], [right_db]]) * swing)
    return out


# ring of the metal rim: f/Hz, level/dB, t60/s
RIM = [(4619, -1, .25), (5593, -10, .35), (7224, 0, .17), (7838, -3, .45), (11160, -5, .14)]


def rim(s=.5805, db=-37, shimmer_db=-34, shimmer_t60=0.38):
    """A clean hit leaves the metal rim singing: a few clear modes in a shimmer of many."""
    out, t = np.zeros((2, N)), np.arange(SR // 2) / SR
    colour = [(1000, -11.0), (3000, -7.0), (4500, -6.5), (7600, -0.5), (8700, -10.5), (15000, -16.0)]
    shimmer = noise(len(t), colour) * fade(t, shimmer_t60)
    singing = ring(RIM, t, scatter_db=1.5, detune=.001)
    add(out, s, undb(db) * singing + undb(shimmer_db) * shimmer)
    return out


def rolling_out(s=3.5, half_s=0.21, db=-68, from_hz=860, to_hz=660, wander_hz=35):
    """A toppled top rolls a little on its rim, with a faint wavering tone that sinks."""
    hz = np.interp(TIME, [s - half_s, s + half_s], [from_hz, to_hz]) + wander_hz * walk(45)
    return swell(s, half_s, db) * undb(3.3 * walk(24.8)) * sine(hz)


# faint rubs: centre t/s, half length/s, level/dB before the window, tilt/dB per octave
RUBS = [(3.371, 0.029, -63.5, -1.5), (3.443, 0.037, -61, 5.5), (3.501, .04, -67, -8),
        (3.658, 0.054, -62, -12), (3.685, 0.037, -62, 4), (3.892, .04, -74, 2), (3.968, 0.017, -57.5, 3.5),
        (4.126, 0.04, -71, 3), (4.361, 0.047, -69, 4), (4.469, 0.042, -68.5, 3), (4.539, 0.042, -66.5, 5),
        (4.67, 0.064, -74, 6)]
# thin swish: f/Hz, level/dB
SWISH = [(300, -11), (6000, -12), (9000, -18), (13000, 0), (16000, 0)]


def handling(bump_hz=81, bump_rise_hz_per_s=110, bump_db=-44, swish_db=-50, ring_db=-9):
    """While the tops are taken out and reloaded: a soft low bump, a brief thin swish and faint rubs."""
    bump = swell(3.558, 0.056, bump_db) * sine(bump_hz + bump_rise_hz_per_s * (TIME - 3.558))
    swish = swell(3.975, .02, swish_db) * noise(N, SWISH)
    out = bump + swish
    for s, half, db, tilt in RUBS:
        size = int(4 * half * SR)
        colour = [(hz, level + tilt * np.log2(hz / 1000)) for hz, level in PLASTIC]
        rub = noise(size, colour, (550, 16000))
        if tilt > 0:  # a bright rub also sets the top's body ringing
            rub = unit(rub + undb(ring_db) * top_ring(rng.standard_normal(size)))
        rub = rub * np.hanning(size) * undb(2.5 * walk(119.9)[:size])
        add(out, s - 2 * half, undb(db) * rub)
    return out


# ripcord pulls, one table each: t/s, level/dB before trim, treble gain above 9 kHz/dB
PULLS = [
    [(4.935, -87, 2.5), (4.949, -36, 0), (4.962, -30.5, 9), (4.982, -34, -1), (5.0, -20, 5),
     (5.025, -19.5, 6), (5.065, -21.5, 0), (5.113, -26, -1), (5.12, -11, 0)],
    [(6.455, -52, -3), (6.487, -24.5, 2), (6.512, -25, 3), (6.519, -18, 6), (6.533, -22, -1),
     (6.541, -18, 2), (6.56, -20, 2), (6.619, -31, 0), (6.625, -48, 0)],
]
# launcher colour: f/Hz, level/dB
LAUNCHER = [(180, -54), (300, -51), (1100, -18), (1280, -15.5), (2320, -7), (3240, -3), (3700, -9.5),
            (4300, 0), (6000, -2.5), (7570, -0.5), (8940, -14), (12500, -5.5), (16000, -12.5)]
LAUNCH_PAN_DB = -1  # left re right: the launcher is held to the right


def ratchet(speed, slow_hz=250, fast_hz=750, tooth_db=3.5, tooth_t60=0.013, size=1024):
    """Each tooth of the ripcord clicks in the launcher, faster as the pull goes on, with jitter."""
    rate = (slow_hz + (fast_hz - slow_hz) * speed) * undb(1.2 * walk(400)[:len(speed)])
    strength = undb(tooth_db * rng.standard_normal(len(speed)))
    teeth = np.diff(np.floor(np.cumsum(rate) / SR), prepend=0) * strength
    decay = fade(np.arange(size)[None] / SR, tooth_t60) ** 2
    energy = np.abs(through(teeth ** 2 / rate, decay))
    return np.sqrt(energy) * noise(len(speed), LAUNCHER)


def gear_whirr(speed, width_hz=450):
    """The gear's whirr: low noise on a carrier rising from 2400 to 5300 Hz with the pull."""
    carrier = sine(2400 + 2900 * np.sin(np.pi * speed / 2))
    return noise(len(speed), PLASTIC, (0, width_hz)) * carrier


def launches(trim_db=1, rub_db=-5, whirr_db=-7):
    """Ripcord pulls: ratchet clicks, rubbing cord and gear whirr under each pull's level curve."""
    out = np.zeros((2, N))
    for pull in PULLS:
        s, db, treble_db = np.transpose(pull)
        t = np.arange(s[0], s[-1], 1 / SR)
        speed = np.linspace(0, 1, len(t))
        cord_rub = noise(len(t), LAUNCHER)
        rip = unit(ratchet(speed)) + undb(rub_db) * cord_rub + undb(whirr_db) * unit(gear_whirr(speed))
        rip = unit(rip)
        treble = signal.sosfiltfilt(signal.butter(4, 9000, "high", fs=SR, output="sos"), rip)
        rip = rip + (undb(np.interp(t, s, treble_db)) - 1) * treble
        rip = rip * undb(np.array([[1], [-1]]) * LAUNCH_PAN_DB / 2)
        add(out, s[0], rip * undb(np.interp(t, s, db) + trim_db) * signal.windows.tukey(len(t), .1))
    return out


def hum(hum_db=-5, patchy_db=4, wander_hz=7, fall_db=-0.1, lowest=3, count=8):
    """A fast rolling tip sings near multiples of its turning rate; each partial wanders, comes and goes."""
    _, rumble, _ = scrape_levels()
    spin_hz = np.interp(TIME, [5.3, 8.5, 8.9, 9.45], [94.9, 86.4, 93.7, 97.3]) * (1 + .014 * walk(7))
    partials = 0
    for k in range(lowest, lowest + count):
        level = undb(patchy_db * walk(13) + fall_db * k)
        partials = partials + level * sine(k * spin_hz + wander_hz * walk(50))
    rolling_db = np.interp(TIME, [5.2, 5.6, 6.4, 6.7, 8.4, 8.8, 8.92, 9.05, 9.45],
                           [-38.0, -1.5, 3.5, 5, -8.0, 10, 8.0, 7.5, 4])
    return unit(partials) * undb(rumble + rolling_db + hum_db)


# a fast tip skids and sizzles: centre t/s, half length/s, level/dB
SKIDS = [(5.426, 0.024, -43), (5.73, 0.031, -35), (6.233, 0.075, -38.5), (6.339, 0.039, -37),
         (7.298, 0.01, -24.5)]
# sizzle colour: f/Hz, level/dB
SIZZLE = [(1500, -24), (3500, -9), (5500, -3), (6900, 1), (7700, -2), (8700, -20), (12000, -13),
          (16000, -15)]


def skids(slips_per_s=900, slip_db=4, ring_t60=0.007, size=1024):
    """Quick slips of a skidding tip: each feeds a brief bright sizzle."""
    slips = (rng.random(N) < slips_per_s / SR) * undb(slip_db * rng.standard_normal(N))
    energy = np.abs(through(slips ** 2, fade(np.arange(size)[None] / SR, ring_t60) ** 2))
    sizzle = unit(np.sqrt(energy) * noise(N, SIZZLE))
    return sizzle * sum(swell(*skid) for skid in SKIDS)


# tail decay, 120-2500 Hz and above 3 kHz: t60/s
ROOM_T60_S = [.45, .18]


def room(dry, low_db=-13, high_db=-11, size=32768):
    """Close walls return a short dense tail; the treble dies first."""
    t = np.arange(size) / SR
    flat = [(30, 0.012), (16000, 0.0015)]
    onset = np.clip(t / 0.0018 - .5, 0, 1)
    tail = 0
    for band, t60, db in zip(((120, 2500), (3000, 49000)), ROOM_T60_S, (low_db, high_db)):
        part = unit(noise(size, flat, band) * fade(t, t60) * onset)
        tail = tail + undb(db) * part * np.sqrt(2 * (band[1] - band[0]) / SR / size)
    return through(dry, tail)


# room tone: f/Hz, level/dB
QUIET = [(18, -39), (30, -14.5), (90, 1.5), (109, 0.5), (1100, -22), (2980, -23), (3490, -19.5),
         (7470, -19), (8740, -36.5), (11400, -22.5), (16000, -18.5)]
QUIET_DB = -69


def scene():
    """Tops and launchers with room tail, plus thumps, handling and room tone without it."""
    dry = tops() + skids() + rolling_out() + hum() + rim() + launches()
    return dry + room(dry) + thumps() + handling() + undb(QUIET_DB) * noise(N, QUIET)


# channel balance: f/Hz, left re right/dB
TILT = [(60, -3.0), (110, -2.0), (200, -2.0), (380, -1.5), (700, -2.5), (1290, -2.5), (2380, -1.0),
        (4400, -1.0), (8120, -1.0), (15000, -3.5)]
CUTOFF_HZ = 15900


def record(dry):
    """The right side is louder, most at both ends of the spectrum; peaks are capped, then the top is cut."""
    lean = np.sqrt(gain_at(np.fft.rfftfreq(N, 1 / SR), TILT))
    sound = irfft(rfft(dry) * np.array([lean, 1 / lean]), N)
    lowpass = signal.ellip(10, .2, 70, CUTOFF_HZ, fs=SR, output="sos")
    return signal.sosfilt(lowpass, np.clip(sound, -1, 1))


dry = scene()
out = record(dry)
unload_audio(out)
```